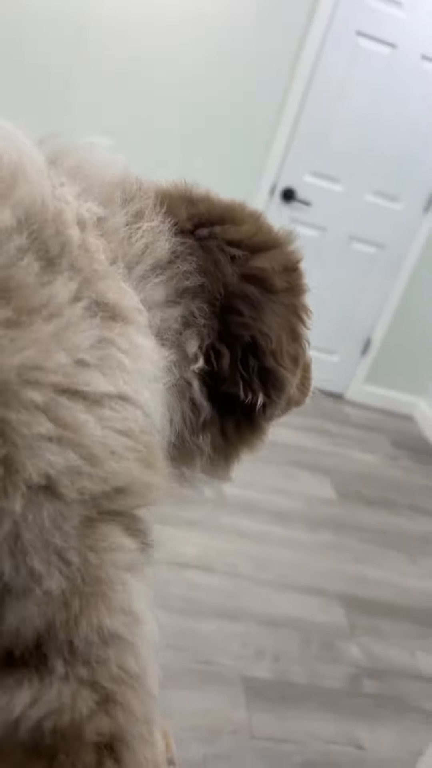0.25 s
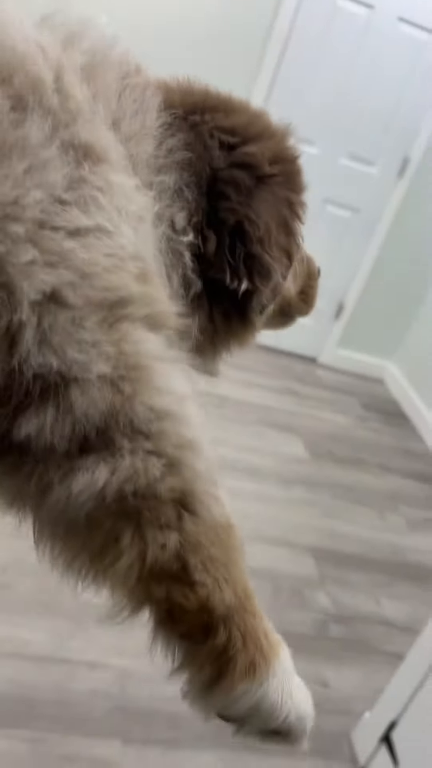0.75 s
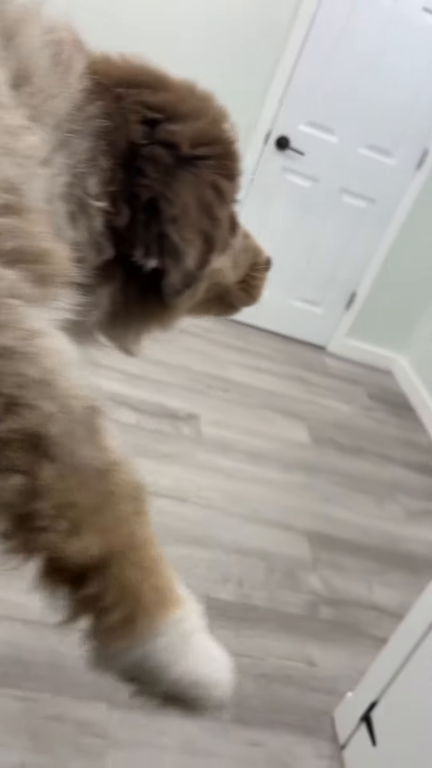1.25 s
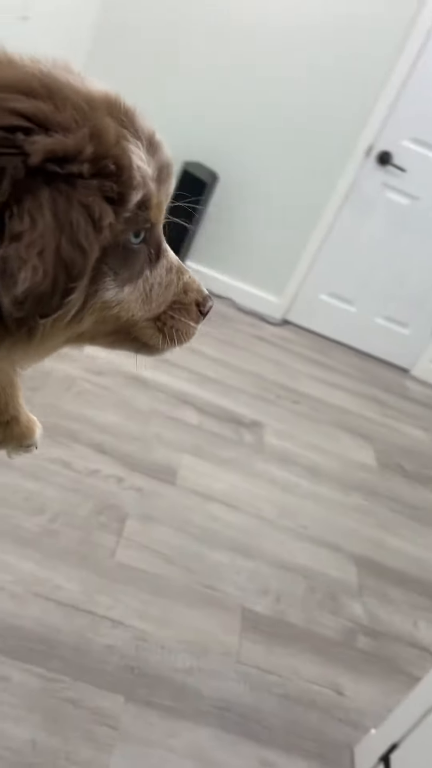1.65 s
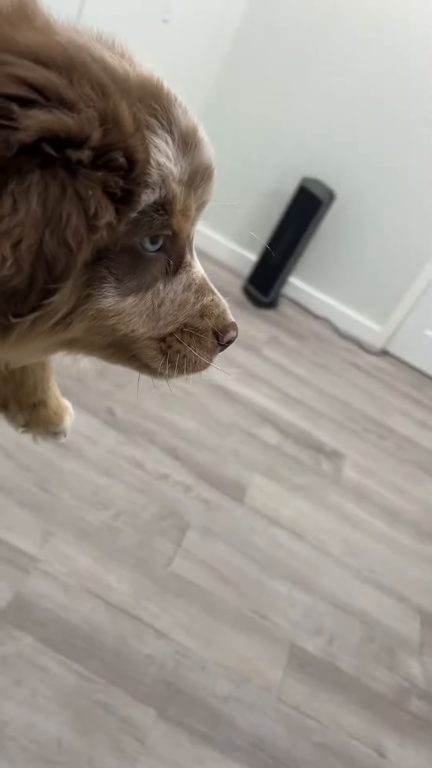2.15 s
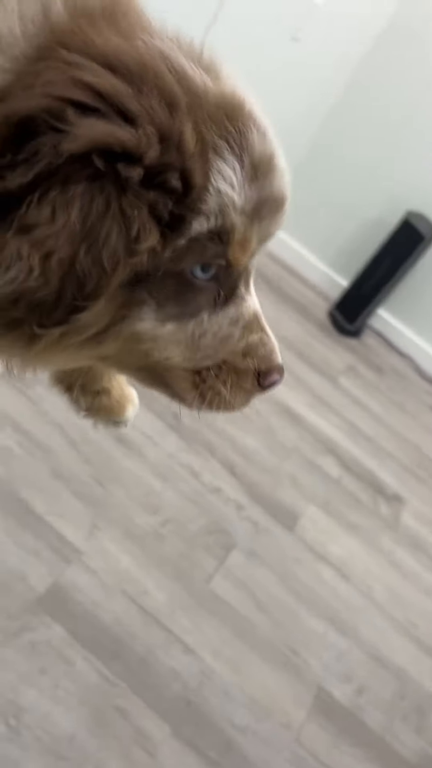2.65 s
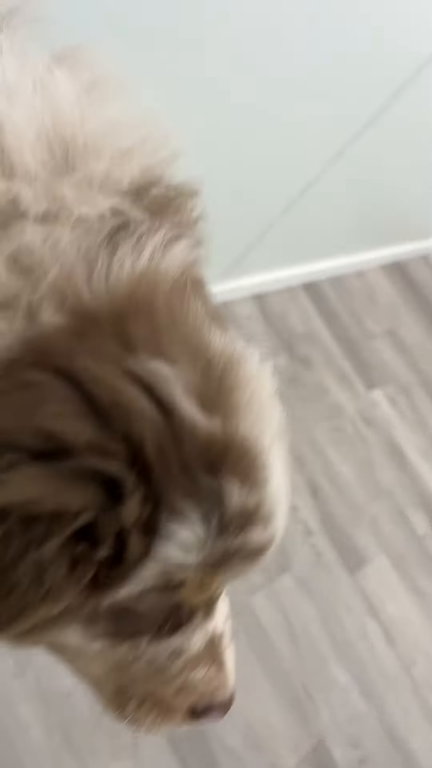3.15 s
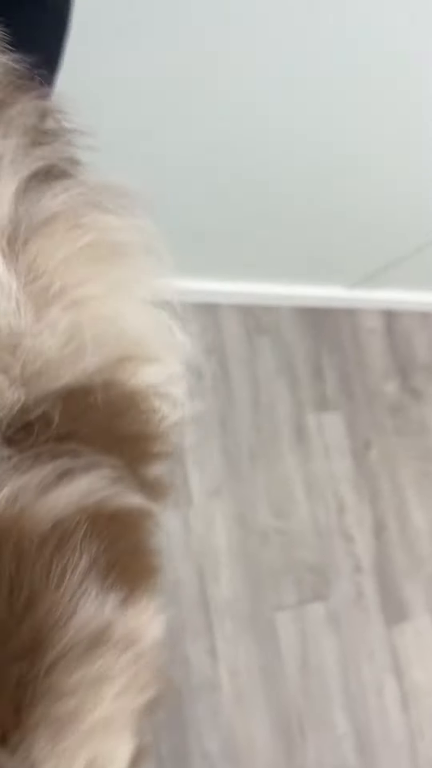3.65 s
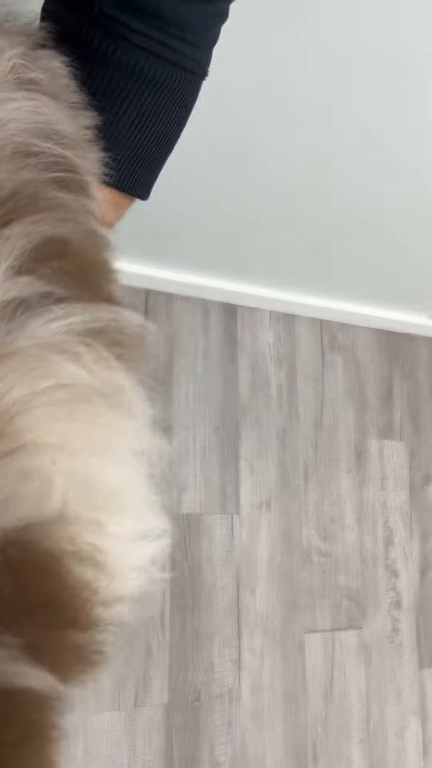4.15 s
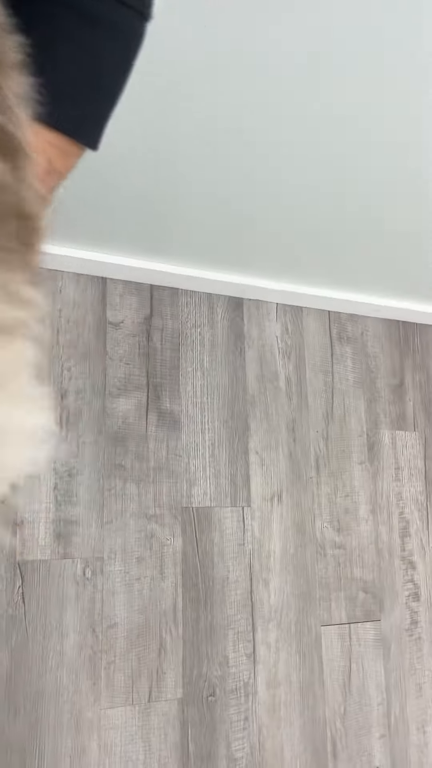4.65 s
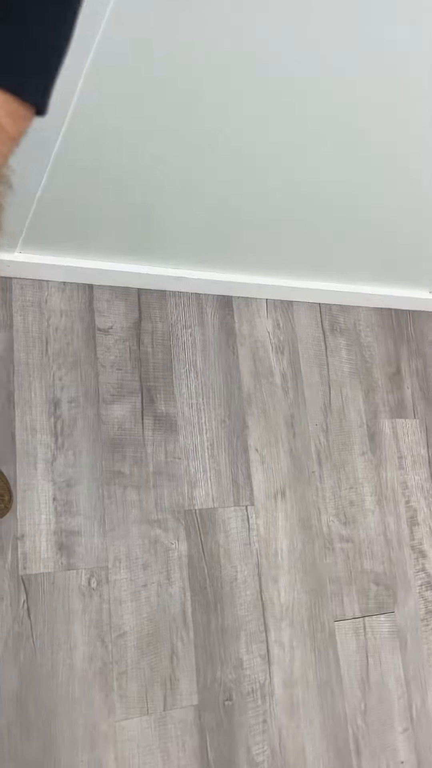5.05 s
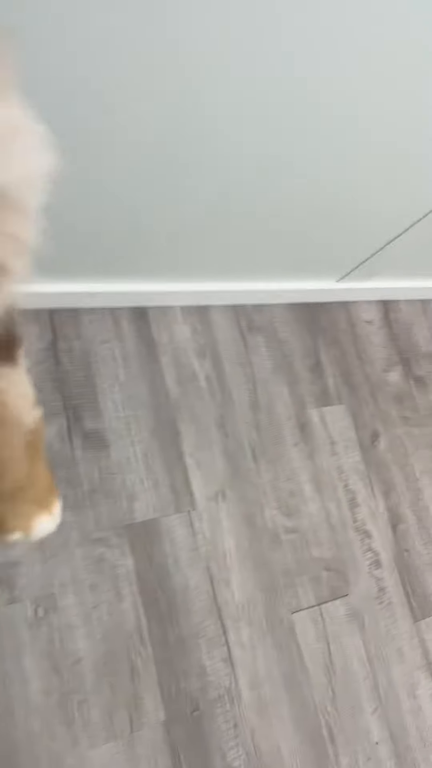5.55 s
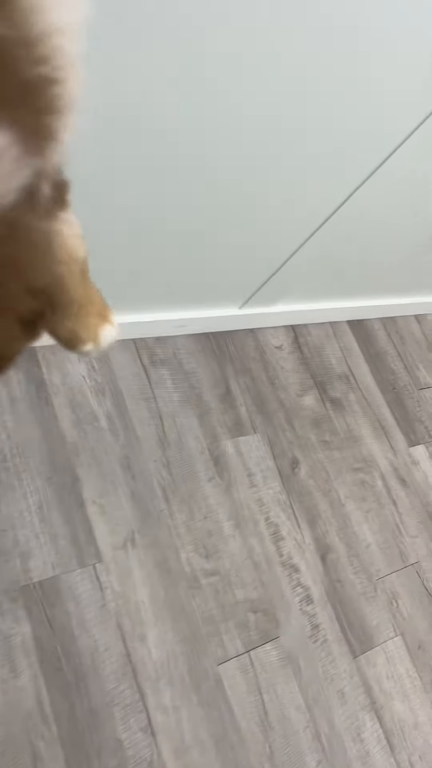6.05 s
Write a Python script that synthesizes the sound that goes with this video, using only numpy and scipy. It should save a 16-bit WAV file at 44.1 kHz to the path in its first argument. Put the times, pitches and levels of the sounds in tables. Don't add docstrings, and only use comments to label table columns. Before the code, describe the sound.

A small bare room with hard walls, heard close in stereo: a low fan hum near 100 Hz and soft air hiss. A thin, very high nose whistle glides down during the first 0.4 s, then a soft step thuds on the boards. A tiny peep at 0.7 s precedes steep falling yelps at 1.0, 1.3 and 1.8 s, nearly pure in tone and ringing off the walls; a firm double footfall with deep rumble lands around 1.25 s. From 2.3 to 3.75 s a high cry drops into a low, trembling, swaying moan. After a pause, pleading whimpers run from 4.35 to 5.05 s, another falls and holds from 5.3 to 5.7 s, and a last one starts at 6.05 s, cut off by the end. Whistles return above them. Fur rustles, claws tick faintly, a firm step lands at 5.95 s, a sharp knock at 6.14 s and a ringing step at 6.29 s as the hum fades.

```python
import sys
import numpy as np
from scipy import signal
from scipy.fft import rfft, irfft, next_fast_len
from scipy.io import wavfile
from scipy.ndimage import uniform_filter1d

SR = 44100
rng = np.random.default_rng(int(sys.argv[2]) if len(sys.argv) > 2 else 0)


def nominal_scale(level):
    x = np.asarray(level, float) / 20
    return 10 ** x


def wrap_up_sound(samples):
    columns = np.atleast_2d(samples).T
    tamed = np.clip(columns, -1, 1)
    steps = np.round(tamed * 32767).astype(np.int16)
    wavfile.write(sys.argv[1], SR, steps)


N = 278271


def evened(x):
    return x / np.sqrt(np.mean(x ** 2) + 1e-20)


def read(points, hz):
    f, value = np.transpose(points)
    return np.interp(np.log(hz + 1), np.log(f + 1), value)


def add(mix, s, sound):
    part = mix[round(s * SR):][:len(sound)]
    part += sound[:len(part)]


def curves(tables, fade=0.008):
    t = np.arange(N) / SR
    rows = np.concatenate(tables)
    gate = np.zeros(N)
    for table in tables:
        since_start, until_end = t - table[0][0], table[-1][0] + fade - t
        gate += np.clip(np.minimum(since_start, until_end) / fade, 0, 1)
    return gate, [np.interp(t, rows[:, 0], column) for column in rows[:, 1:].T]


def drift(size):
    return evened(uniform_filter1d(uniform_filter1d(rng.standard_normal(N), size), size))


def coloured(x, gain):
    size = next_fast_len(N + 4096)
    return irfft(rfft(x, size) * gain(np.fft.rfftfreq(size, 1 / SR)), size)[..., :N]


def swells(events, rise_s, rest_db):
    t = np.arange(N) / SR
    power = nominal_scale(2 * rest_db)
    for s, db, t60 in events:
        u = np.maximum(t - s, 0)
        rise = 1 - np.exp(-(u / rise_s) ** 2)
        power = power + (nominal_scale(db - 60 * u / max(t60, .1)) * rise) ** 2
    return np.sqrt(power)


# frequency in Hz, likeness from 0 to 1.
LIKENESS = [(60, 0.96), (250, 0.89), (700, 0.56), (1700, 0.8), (3000, 0.32), (4500, 0.056), (5800, 0.58),
            (7400, 0.99), (9000, 0.93), (15000, 1)]


def noise(spectrum, patchy_db):
    frames, hz = N // 256 + 5, np.fft.rfftfreq(1024, 1 / SR)
    a, b, c, d, patches = rng.standard_normal((frames, 513, 5)).T
    patches = evened(uniform_filter1d(uniform_filter1d(patches, 14, 0), 12, 1))
    same = np.clip(read(LIKENESS, hz), -1, 1)[:, None]
    left, other = a + 1j * b, c + 1j * d
    ports = np.array([left, same * left + np.sqrt(1 - same ** 2) * other])
    ports = ports * nominal_scale(read(spectrum, hz)[:, None] + patchy_db * patches)
    return evened(signal.istft(ports, nperseg=1024, noverlap=768)[1][:, :N])


# start in seconds, length in seconds, first pitch in Hz, last pitch in Hz,
# level in dB.
WHISTLES = [
    (0.0, 0.44, 8390, 7045, -65),
    (0.95, 0.2, 7800, 7450, -85.5),
    (1.376, 0.082, 8160, 7770, -65.5),
    (1.803, 0.18, 8170, 7790, -75.5),
    (2.331, 0.13, 8200, 7900, -87),
    (4.347, 0.27, 7840, 8155, -68),
    (5.251, 0.19, 7580, 7900, -72),
    (5.904, 0.21, 7950, 7750, -71.5),
    (6.002, .16, 7570, 7380, -72),
]


def nose_whistle(gate, fold_turn):
    t, hz, level = np.arange(N) / SR, np.zeros(N), np.zeros(N)
    settle, rise_s, fade_db = 4.2, 0.013, -12.5
    for s, length, first_hz, last_hz, db in WHISTLES:
        u = (t - s) / length
        inside = (u >= 0) & (u < 1)
        along = np.clip(u, 0, 1)
        hz = np.where(inside, last_hz + (first_hz - last_hz) * np.exp(-settle * along), hz)
        edges = np.clip(np.minimum(u, 1 - u) * length / rise_s, 0, 1)
        level += inside * edges * nominal_scale(db + fade_db * along ** 3)
    turn = 2 * np.pi * np.cumsum(hz * (1 + .002 * drift(size=120))) / SR
    swayed = np.cos(turn) * (1 + 0.62 * gate * np.cos(fold_turn))
    octave_db = -5 - 22.5 * (hz - 7400) / 1000
    whistle = nominal_scale(15) * level * (swayed + nominal_scale(octave_db) * np.cos(2 * turn))
    return whistle * nominal_scale(2.5 * drift(size=200))


# frequency in Hz, t60 in seconds.
WALLS = [(300, 0.3), (800, 0.53), (2000, 0.4), (5500, 0.57), (12000, 0.067)]


def room(x):
    taps = np.zeros((2, SR))
    at = np.arange(150, SR - 20, 20) + rng.integers(0, 20, (2, (SR - 151) // 20))
    np.put_along_axis(taps, at, rng.choice([-1., 1.], at.shape), 1)
    hz, t, z = signal.stft(taps, SR, nperseg=256)
    z = z * nominal_scale(-60 * t / read(WALLS, hz)[:, None])
    same = np.clip(read(LIKENESS, hz), 0, 1)[:, None]
    apart = 1.157 * np.sqrt((1 - same) / (1 + same))
    tail = signal.istft([z[0] + apart * z[1], z[0] - apart * z[1]], SR, nperseg=256)[1]
    return signal.fftconvolve(x[None], tail / np.linalg.norm(tail[0]), axes=1)[:, :N]


# time in seconds, openness of the room around the microphone in dB,
# fan loudness in dB.
CARRIED = [(0.0, -66, -60), (0.3, -70.5, -57), (0.5, -61, -59), (1.4, -60, -55), (1.75, -62, -57),
           (2.7, -66.5, -57.5), (3.5, -63.5, -56.5), (3.9, -69.5, -59), (4.2, -75.5, -61.5),
           (4.5, -66, -59.5), (5.2, -69.5, -62), (5.7, -57, -60.5), (5.87, -59, -60.5), (6.1, -63, -83),
           (6.32, -55.5, -94)]


def fan():
    _, (air_db, fan_db) = curves([CARRIED])
    turn = 2 * np.pi * np.cumsum(98.26 + 2.4 * drift(size=2000)) / SR
    waver = nominal_scale(1.4 * drift(size=900))
    return np.sqrt(2) * waver * (nominal_scale(fan_db) * np.cos(turn) + nominal_scale(air_db - 7.5) * np.cos(2 * turn))


# frequency in Hz, density in dB per Hz.
ROOM_AIR = [(35, -58), (60, -14.5), (102, -4), (129, -18), (198, -14), (357, -19), (1280, -31),
            (3150, -36.5), (3610, -38.5), (5560, -38.5), (6500, -62), (8450, -74), (14300, -120)]


def room_air():
    _, (air_db, _) = curves([CARRIED])
    return nominal_scale(air_db + 2.5) * noise(ROOM_AIR, patchy_db=4.0)


# frequency in Hz, density in dB per Hz.
RUMBLE = [(18, -40.5), (30, -18), (54, 9), (85, -4), (110, -51.5), (190, -120)]
# start in seconds, peak in dB, t60 in seconds.
THUDS = [
    (0.44, -41, .9),
    (0.93, -62.5, .4),
    (1.27, -39, 2.3),
    (1.66, -48.5, 2.5),
    (2.33, -60.5, 2.3),
    (3.5, -63.5, 1.8),
    (4.39, -54, 0.12),
    (5.79, -58.5, .35),
    (6.27, -54, 0.55),
]


def floor_rumble():
    rumble = evened(coloured(rng.standard_normal(N), lambda f: nominal_scale(read(RUMBLE, f)) * (f < 90)))
    return swells(THUDS, rise_s=0.042, rest_db=-66) * rumble


# frequency in Hz, density in dB per Hz.
RUSTLE = [(3000, -22.5), (5200, -12.5), (6200, -15), (7300, -9.5), (8500, -9.5), (10500, -13.5),
          (12000, -21.5), (14000, -18.5), (16000, -36.5)]
# start in seconds, peak in dB, t60 in seconds.
BRUSHES = [(0.09, -83, 8.5), (1.0, -78.5, 0.9), (1.29, -74.5, 2.13), (1.68, -81, 0.32), (1.86, -76.5, 1.9),
           (2.17, -77.5, 0.46), (2.33, -71, 0.95), (3.1, -88, 3.0), (3.5, -106.5, 2.3), (3.96, -92, 1.7),
           (4.4, -74.5, 0.51), (4.75, -86, 2.35), (5.29, -71.5, 1.3), (5.55, -87, 3.9), (5.9, -78, 3.4),
           (6.11, -64, 0.59), (6.28, -66, .5)]


def fur_rustle(dog):
    voice = np.sqrt(abs(uniform_filter1d(dog ** 2, size=3000)))
    level = nominal_scale(16.5) * swells(BRUSHES, rise_s=0.017, rest_db=-102) + nominal_scale(-40) * voice
    return level * noise(RUSTLE, patchy_db=4.5)


# start in seconds, peak in dB, ring time as a factor.
STEPS = [
    (0.403, -57, 1.0),
    (0.447, -52, 0.67),
    (0.797, -71, 0.47),
    (1.103, -73, 0.91),
    (1.249, -50, 0.3),
    (1.325, -53, 0.69),
    (3.16, -59, 0.18),
    (5.947, -48.5, 0.33),
    (6.287, -45, 1),
]
# frequency in Hz, level in dB, t60 in seconds.
BOARDS = [(165.1, 3.5, 0.82), (222.2, -0.5, 0.66), (278.4, -5, 0.4), (419, 4, 0.082), (500, -19.5, 0.071)]


def steps():
    out, t = np.zeros(N), np.arange(SR // 2) / SR
    soft_onset = 1 - np.exp(-t / 0.004)
    for (s, db, ring), draw in zip(STEPS, rng.random((len(STEPS), len(BOARDS)))):
        modes = 0
        for (f, mode_db, t60), u in zip(BOARDS, draw):
            hz = f * (1 + .05 * (u - .5))
            modes = modes + nominal_scale(mode_db - 60 * t / (t60 * max(ring, .2))) * np.sin(2 * np.pi * (hz * t + u))
        add(out, s, nominal_scale(db + 2) * modes * soft_onset)
    return out


# frequency in Hz, level in dB.
MUZZLE = [(1200, 20), (2000, 7), (2700, 5.5), (3200, 6.5), (3800, -5), (4500, 0.5), (6000, -32),
          (8500, -15.5), (11000, -28.5)]
# time in seconds, pitch in Hz, effort in dB, mouth opening (0 shut,
# about 1 wide).
YELPS = [
    [(0.697, 916, -32, 0.0), (0.712, 937, -64, 0.1), (0.735, 920, -80, .2)],
    [(0.972, 1552, -38.5, 0), (0.99, 1503, -37, 0.4), (1.02, 1490, -46.5, 0), (1.04, 1391, -30.5, 0.2),
     (1.066, 1105, -38.5, 0.7), (1.096, 686.3, -43, 0.4), (1.125, 590, -61.5, 0.72)],
    [(1.324, 1426, -33, 0.3), (1.345, 1458, -41.5, 0.19), (1.416, 1109, -45.5, 0.82),
     (1.45, 763.5, -42.5, 0.83), (1.51, 625, -43.5, 0.56), (1.565, 546, -53, 0.96), (1.638, 530, -59, 1.07),
     (1.7, 532, -51.5, 0.2)],
    [(1.83, 1129, -69, 0), (1.852, 1119, -47, 0.67), (1.908, 704.5, -41, 0.49), (1.974, 700, -34.5, 0.55),
     (1.99, 756, -58, 0.36), (2.04, 747, -42.5, 0.99), (2.07, 540, -42.5, 0.49), (2.118, 492, -43, 0.59),
     (2.21, 495, -56, 0.43)],
]
MOAN = [
    [(2.322, 1135, -44.5, .4), (2.342, 1301, -37.5, 0.34), (2.378, 1290, -44.5, 0.65),
     (2.43, 626, -42.5, 0.6), (2.494, 516, -43.5, 0.65), (2.68, 601, -45, 0.57), (2.725, 541.5, -45, 0.56)],
    [(2.762, 430, -35, 0.22), (2.81, 386, -42, 0.43), (2.87, 434.3, -36, 0.13), (2.976, 500, -41.5, 0.39),
     (3.052, 487, -35.5, 0.1)],
    [(3.088, 393, -41, 0.39), (3.146, 381.7, -43.5, 0.14), (3.19, 448.5, -39.5, .25),
     (3.246, 440, -42, 0.28), (3.286, 594.5, -44.5, 0.26), (3.326, 608.8, -33, 0.15),
     (3.384, 607.6, -58, 0.8)],
    [(3.436, 466.6, -43.5, 0.44), (3.6, 477.4, -43.5, 0.31), (3.682, 463.6, -41, 0.39),
     (3.718, 530, -45, 0.23), (3.76, 545.5, -63.5, 0.91)],
]
PLEAS = [
    [(4.35, 816.2, -50, .05), (4.37, 918, -49.5, 0.22), (4.43, 1000, -55, 0.099),
     (4.485, 1065, -44.5, 0.54), (4.535, 772, -45.5, 0.57), (4.584, 649.5, -48, .65),
     (4.67, 605, -43.5, 0.38), (4.786, 582.4, -44, 0.55)],
    [(4.85, 733.6, -40, 0.63), (4.9, 722, -41.5, 0.8), (4.96, 721.2, -44.5, 0.98),
     (4.974, 645.7, -36.5, 0.55), (5.002, 402.8, -38.5, 0.4), (5.028, 355.7, -59, 0.9),
     (5.06, 366.4, -70.5, 1.235)],
    [(5.285, 1120, -49.5, 0.38), (5.328, 1188, -38.5, 0.59), (5.364, 981, -43.5, 0.35),
     (5.39, 741.6, -47, 0.79), (5.44, 636.3, -49, 0.78), (5.478, 627, -54, 0.76), (5.518, 643, -43, 0.73),
     (5.69, 628.2, -51.5, 0.55), (5.73, 628.6, -93, 0.51)],
    [(6.058, 1232, -49.5, 0.77), (6.095, 911, -44.5, 0.6), (6.137, 745.6, -45, 0.62),
     (6.201, 691, -46, 0.7), (6.259, 705.2, -41, 0.26), (6.32, 695, -47, 0.73)],
]


def cry():
    joined = [sum(MOAN, []), sum(PLEAS[:2], [])]
    gate, (hz, first_db, mouth) = curves(YELPS + joined + PLEAS[2:])
    hz = uniform_filter1d(hz, size=500)
    glide = uniform_filter1d(abs(np.gradient(np.log2(hz))) * SR, size=600)
    second_db = first_db - 31 + 36 * mouth - .8 * glide
    upper_db = first_db - 39.5 + 34.5 * mouth - 5 * np.log2(hz / 600)
    slack = (550 / hz) ** 2
    uneven = .007 * drift(size=60) + .009 * drift(size=500)
    turn = 2 * np.pi * np.cumsum(hz * (1 + slack * uneven)) / SR
    upper = np.zeros(N)
    for k in range(3, 14):
        even_db = -7 * (k % 2 == 0)
        upper += nominal_scale(read(MUZZLE, k * hz) + even_db + 3 * drift(size=2000)) * np.cos(k * turn)
    upper /= np.sqrt(uniform_filter1d(upper ** 2, 3000) + 1e-9)
    air = evened(coloured(rng.standard_normal(N), lambda f: nominal_scale(read(MUZZLE, f)) * (f > 1200)))
    upper = upper + .36 * np.sqrt(slack) * air * (1 + np.cos(turn))

    def beads():
        tremble = coloured(rng.standard_normal(N), lambda f: np.exp(-((f - 24) / 16) ** 2))
        return 1 + 0.56 * np.sqrt(slack) * evened(tremble)

    first = np.sqrt(2) * beads() * nominal_scale(first_db) * np.cos(turn)
    second = np.sqrt(2) * beads() * nominal_scale(second_db) * np.cos(2 * turn)
    return gate * (first + second + beads() * nominal_scale(upper_db) * upper), gate, turn


def puppy():
    voice, gate, fold_turn = cry()
    return voice + nose_whistle(gate, fold_turn)


# time in seconds, peak in dB.
TICKS = [
    (1.9185, -60),
    (2.3294, -58),
    (3.159, -62),
    (5.27, -70),
    (6.1445, -36),
    (6.1415, -48),
    (6.2914, -62),
]
# frequency in Hz, radians the left port leads.
LEAD = [(60, 0), (300, .15), (700, .7), (1200, 1.5), (2800, 2.8), (5900, 3.2), (6900, 3.9), (7900, 5.4),
        (9100, 6.28), (10400, 7), (12100, 9.42), (13500, 10.2), (15200, 12.56)]


def ticks():
    out, t = np.zeros(N), np.arange(600) / SR
    for (s, db), snap in zip(TICKS, rng.standard_normal((len(TICKS), 600))):
        add(out, s, nominal_scale(db) * (.6 * snap + np.sin(2 * np.pi * 4400 * t)) * np.exp(-t / .0009))
    return coloured(out, lambda f: np.exp(-1j * np.array([[.5], [-.5]]) * read(LEAD, f)))


def scene():
    dog, feet = puppy(), steps()
    ringing = nominal_scale(-1) * room(dog + 1.3 * feet)
    background = fan() + floor_rumble() + room_air() + fur_rustle(dog)
    return dog + feet + ringing + background + ticks()


def masked(ports, under_db=11, quiet_db=-97, left_db=-30):
    hz, _, z = signal.stft([ports[0] + ports[1], ports[0] - ports[1]], SR, nperseg=1024)
    power = np.add.reduceat(abs(z) ** 2, np.arange(0, 513, 9), axis=1)
    power = np.repeat(power, 9, axis=1)
    hidden = (power * nominal_scale(2 * under_db) < power[::-1]) | (power < nominal_scale(2 * quiet_db))
    z = z * np.where(hidden & (hz > 2500)[:, None], nominal_scale(left_db), 1)
    mid, side = signal.istft(z, SR, nperseg=1024)[1][:, :N]
    return np.array([mid + side, mid - side]) / 2


def low_pass(x):
    return signal.sosfilt(signal.butter(12, 15800, fs=SR, output="sos"), x)


# frequency in Hz, left minus right in dB.
TILT = [(60, 0), (250, -.8), (550, 1), (1400, 4), (2500, .7), (4500, -1.5), (6000, 0), (15000, 0)]
# frequency in Hz, gain in dB.
MICROPHONE = [(20, -29), (32, -13.5), (42, -2.5), (5200, 6.5), (10500, -7.5), (12000, -8), (15500, -1),
              (15900, -51)]


def record(dry):
    half = np.array([[.5], [-.5]])

    def response(f):
        return nominal_scale(read(MICROPHONE, f) + half * read(TILT, f)) * np.exp(1j * half * read(LEAD, f))

    mix = masked(coloured(dry, response))
    return low_pass(mix)


dry = scene()
out = record(dry)
wrap_up_sound(out)
```